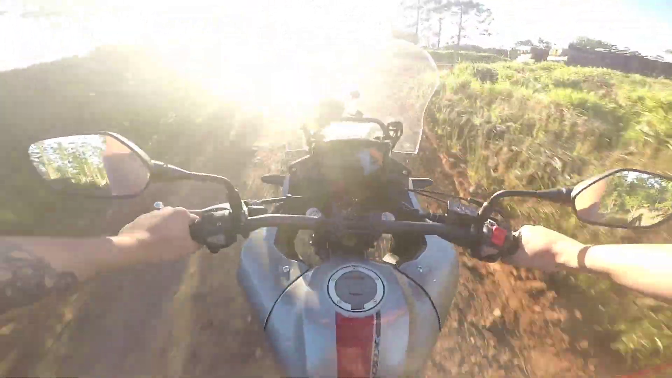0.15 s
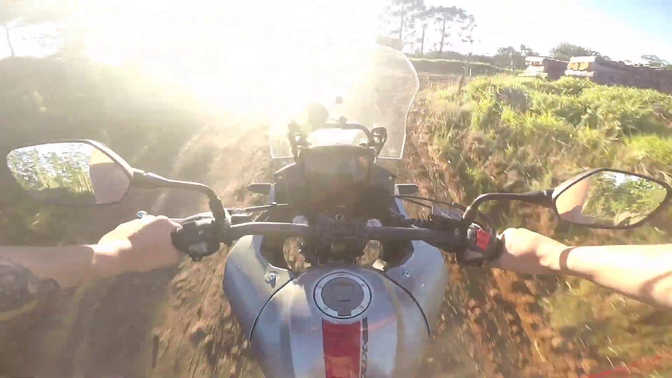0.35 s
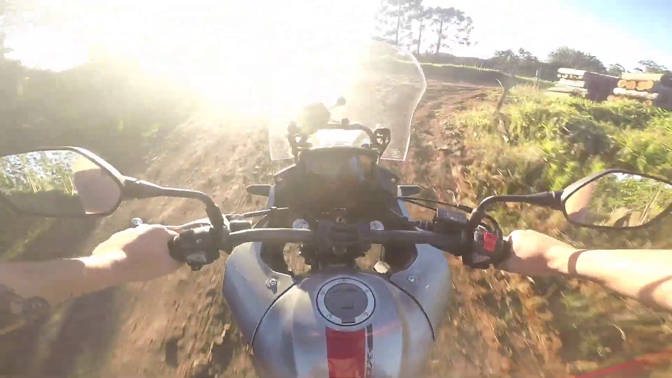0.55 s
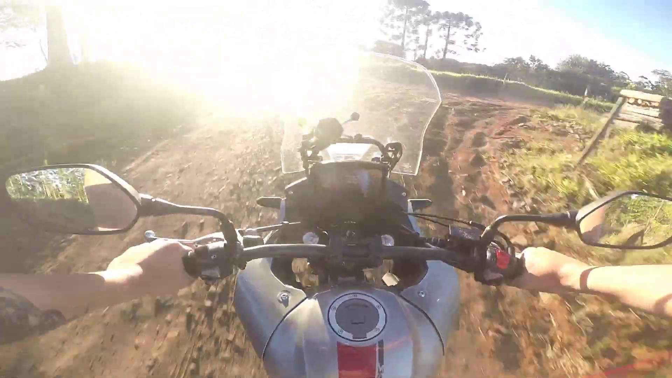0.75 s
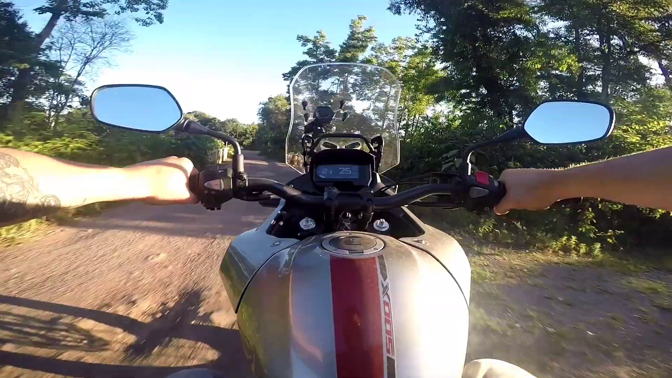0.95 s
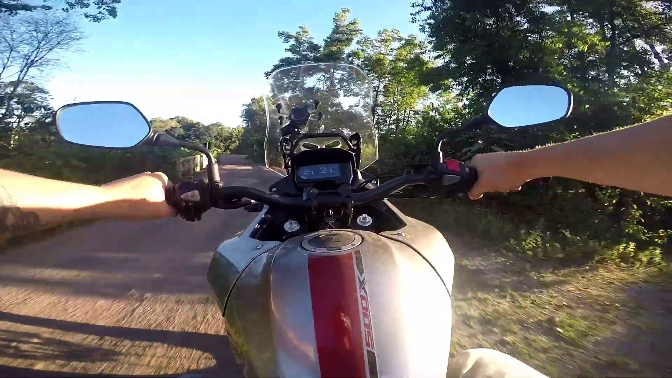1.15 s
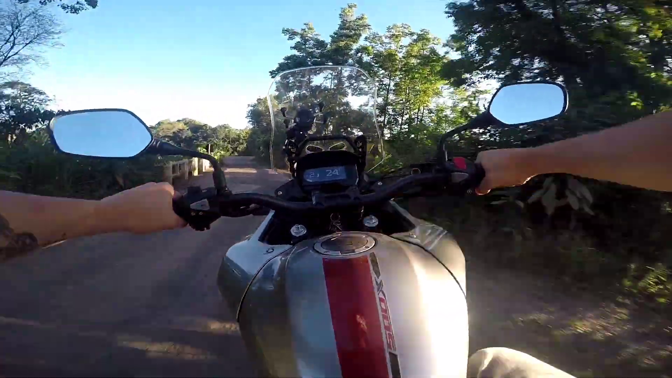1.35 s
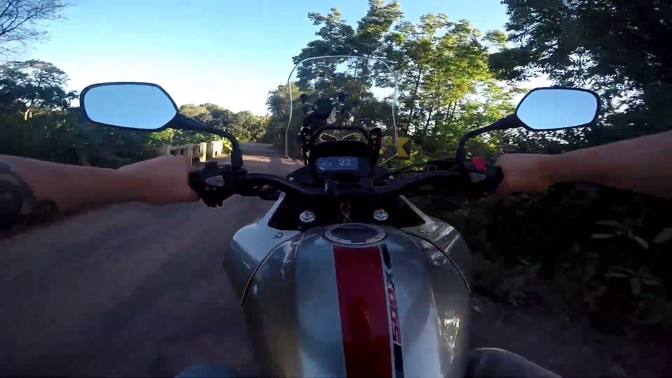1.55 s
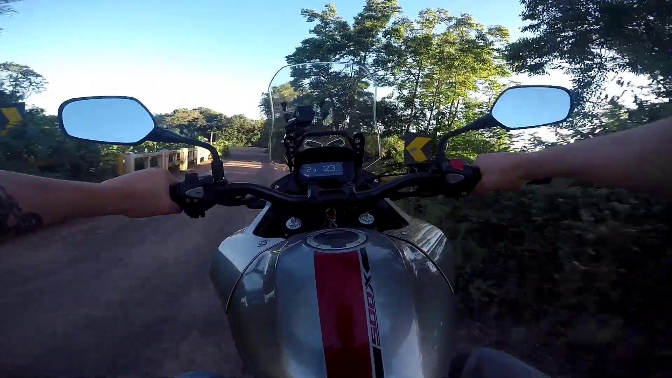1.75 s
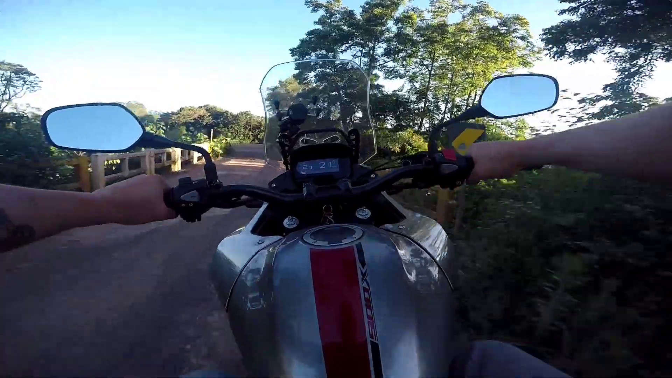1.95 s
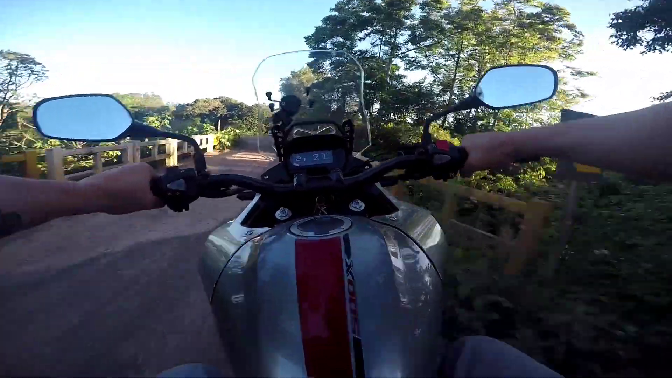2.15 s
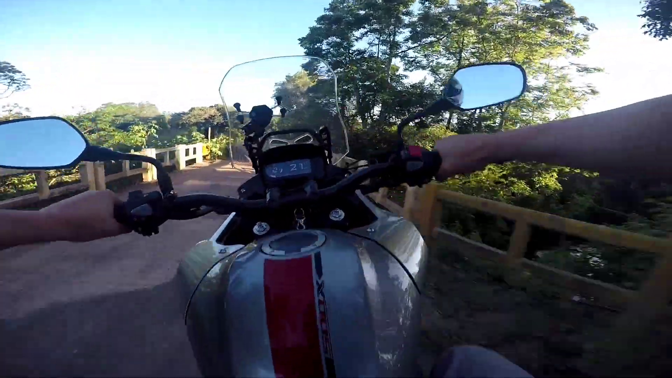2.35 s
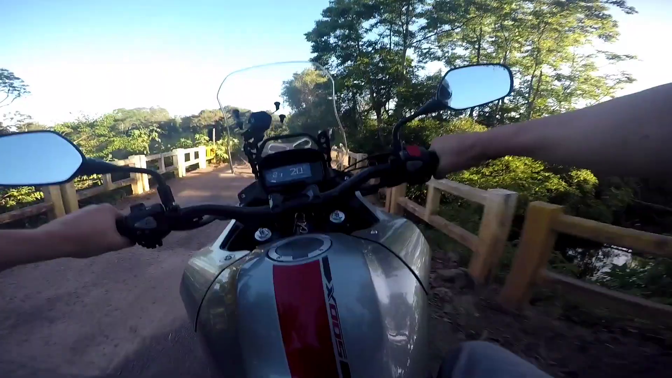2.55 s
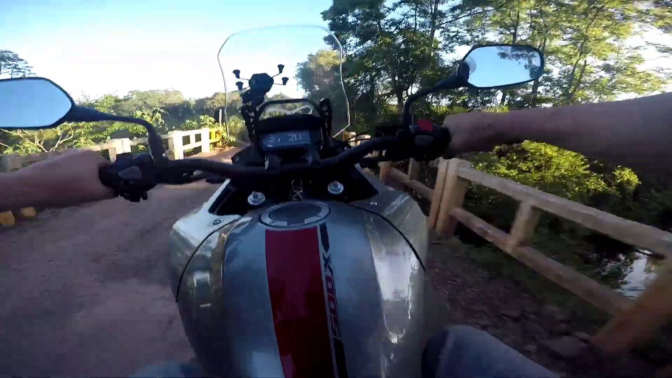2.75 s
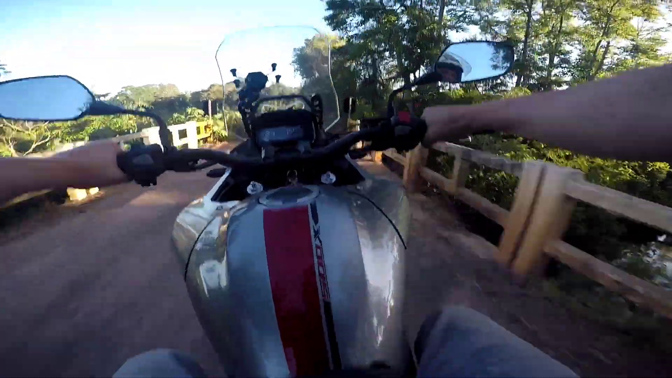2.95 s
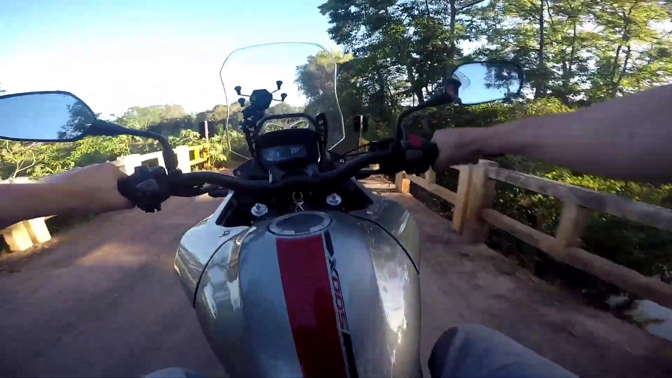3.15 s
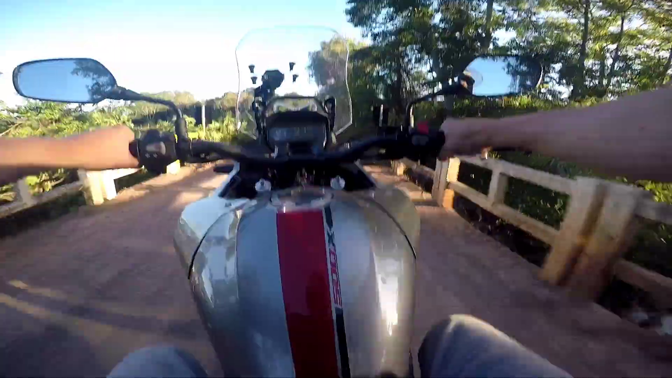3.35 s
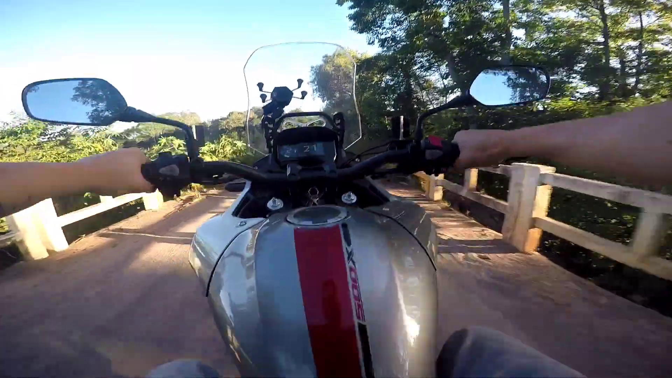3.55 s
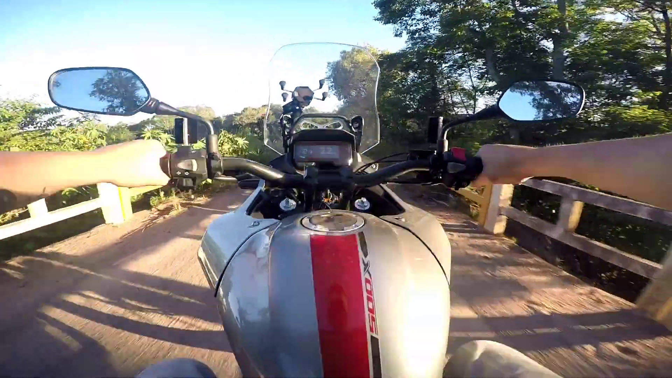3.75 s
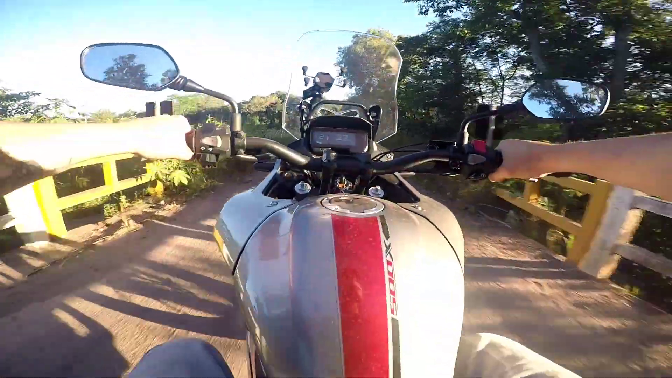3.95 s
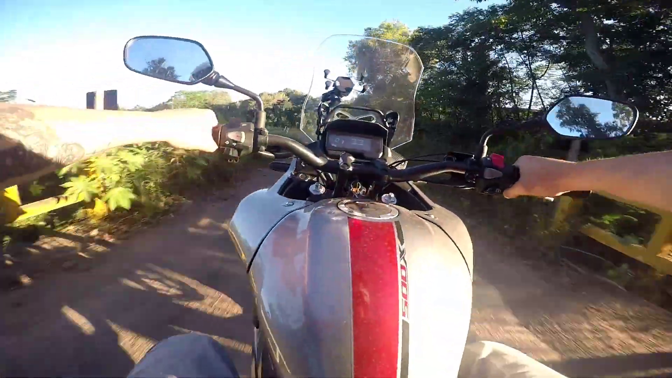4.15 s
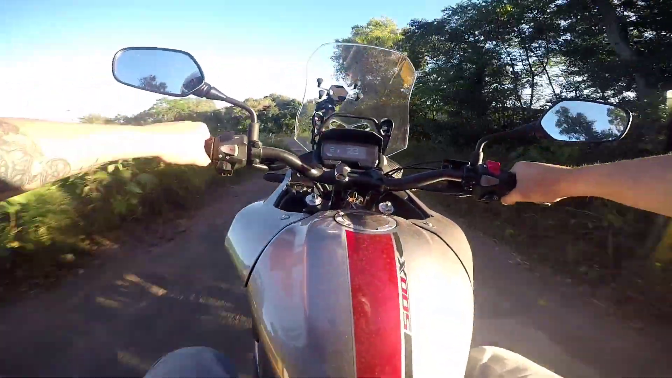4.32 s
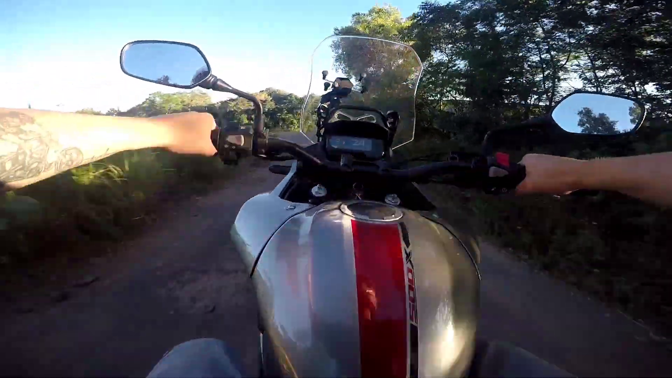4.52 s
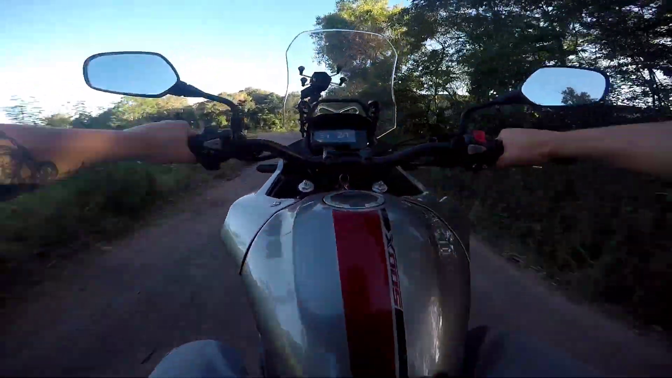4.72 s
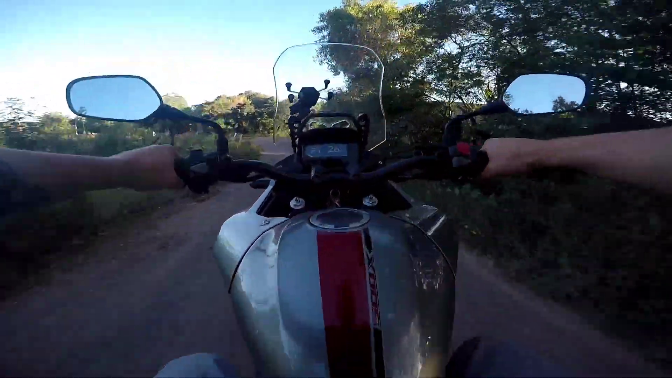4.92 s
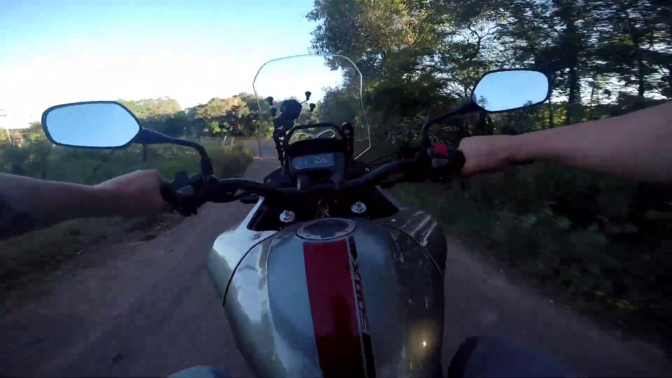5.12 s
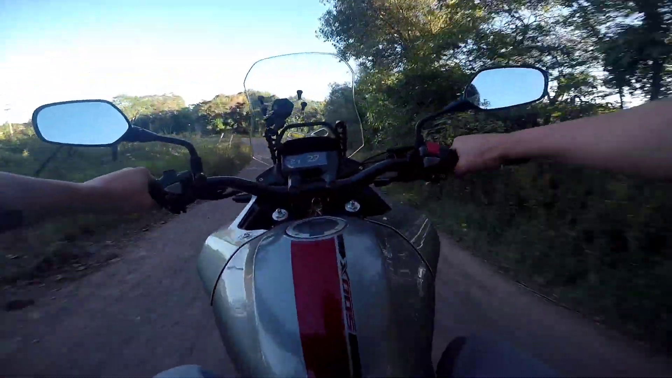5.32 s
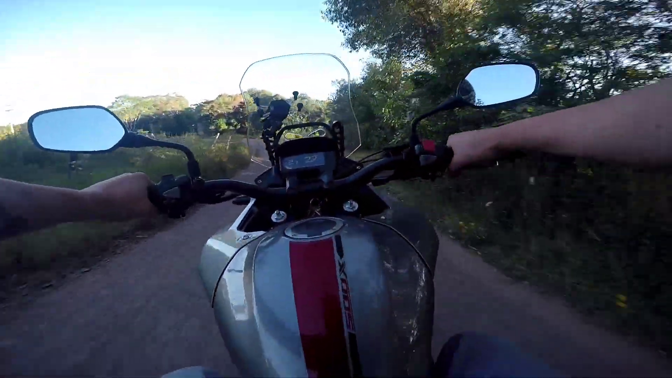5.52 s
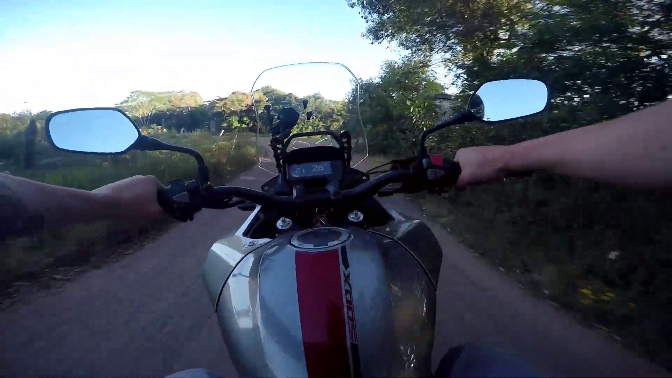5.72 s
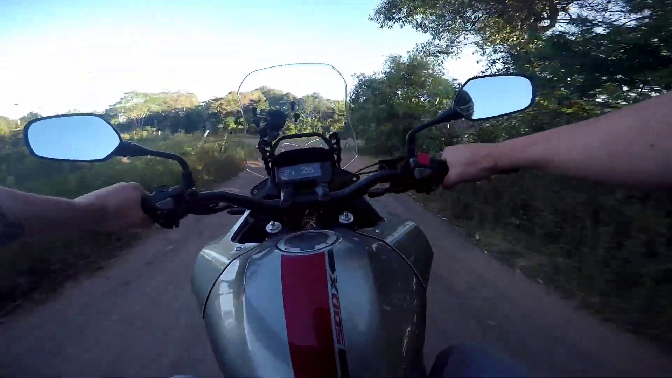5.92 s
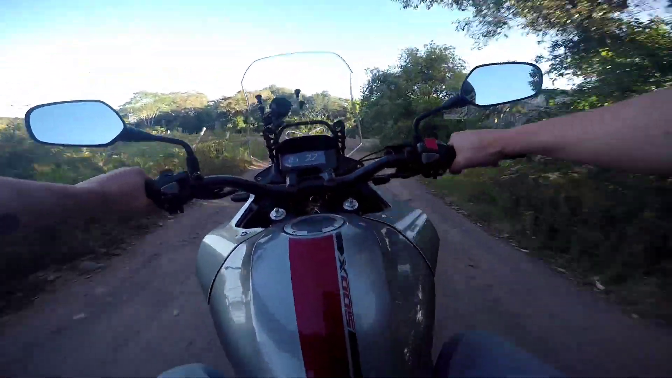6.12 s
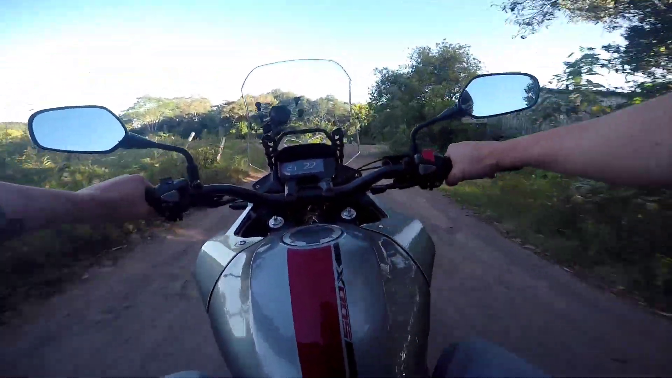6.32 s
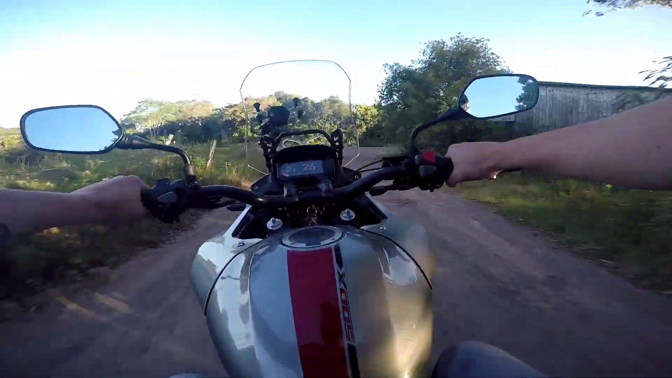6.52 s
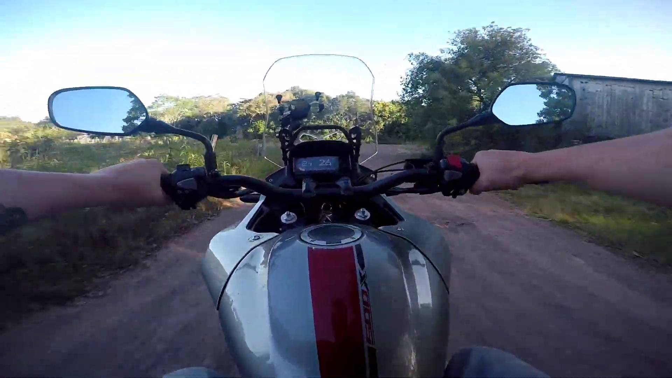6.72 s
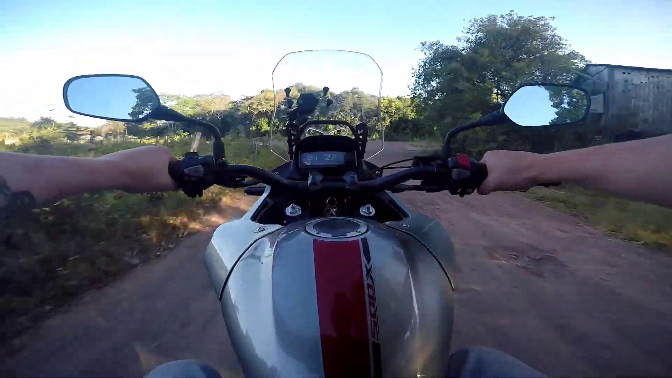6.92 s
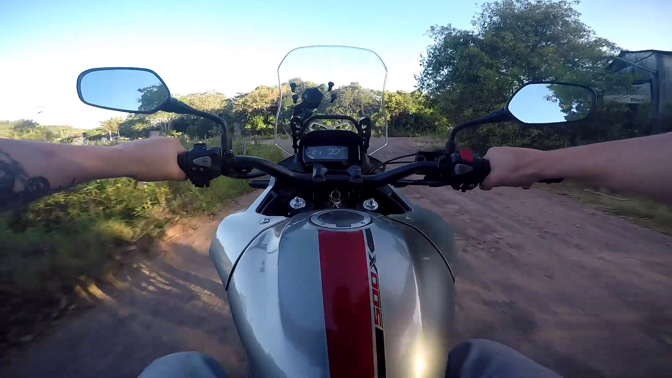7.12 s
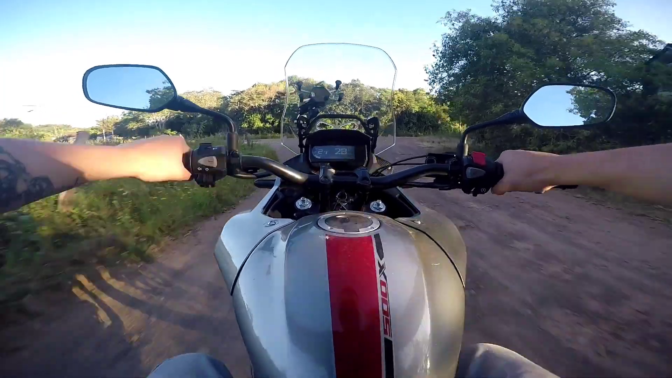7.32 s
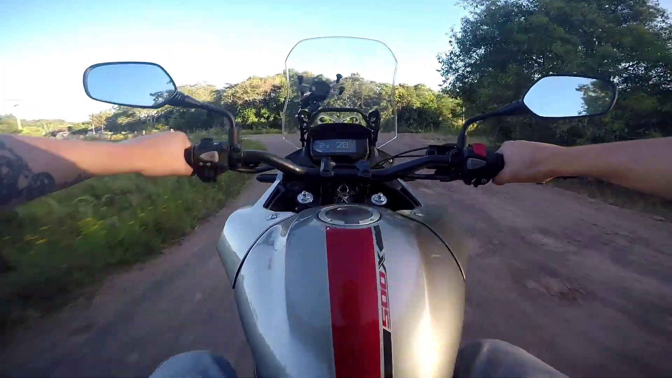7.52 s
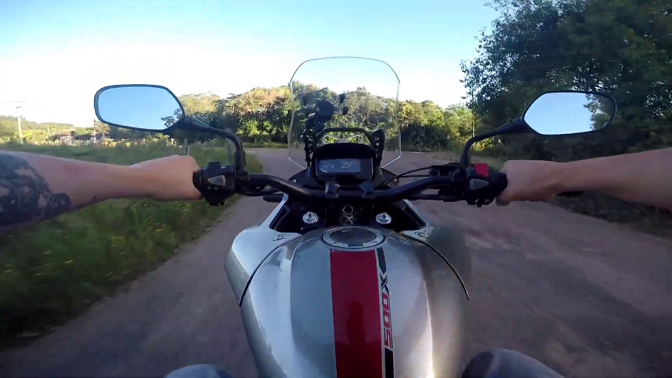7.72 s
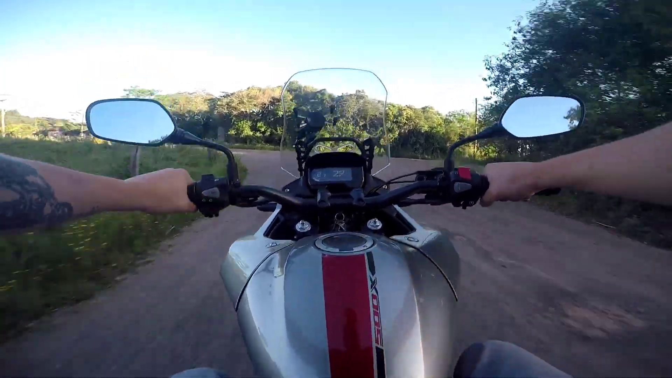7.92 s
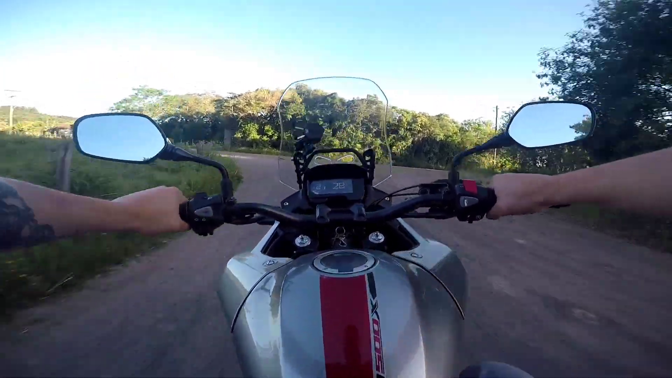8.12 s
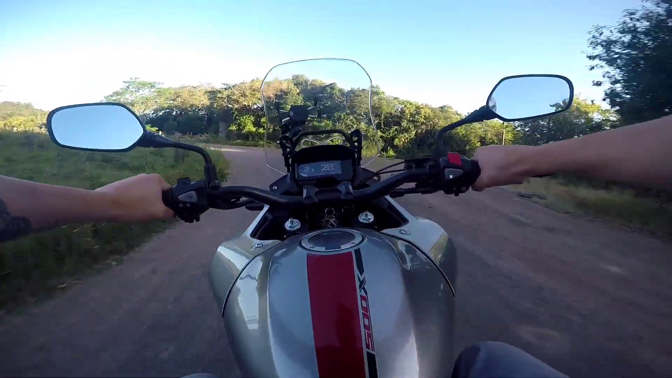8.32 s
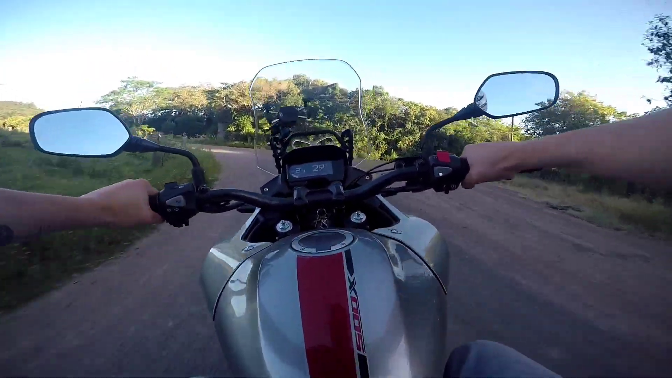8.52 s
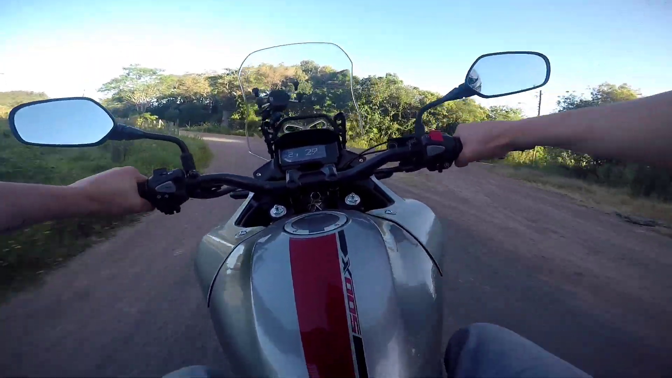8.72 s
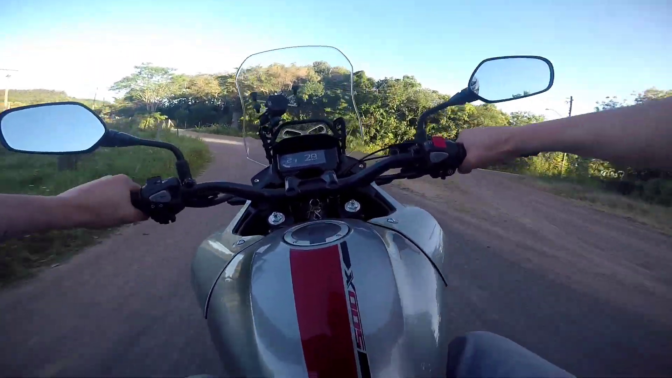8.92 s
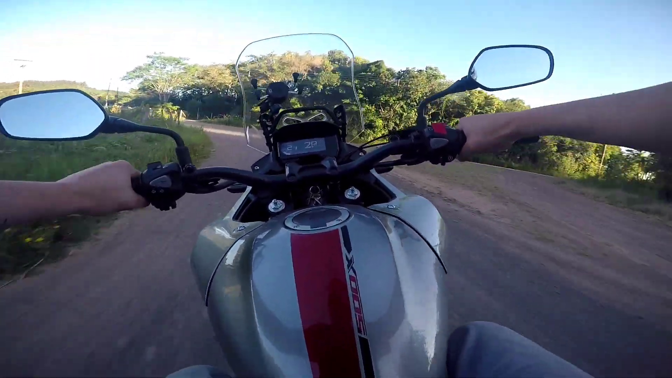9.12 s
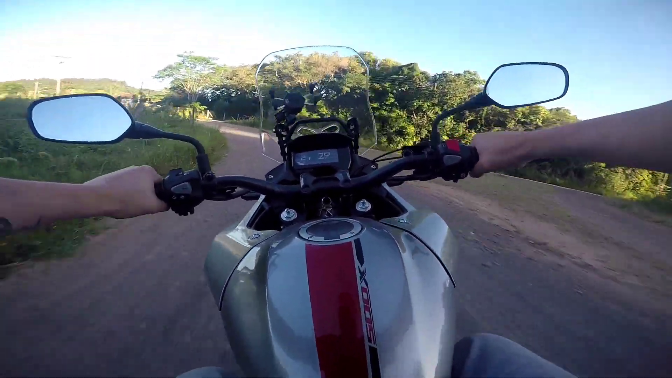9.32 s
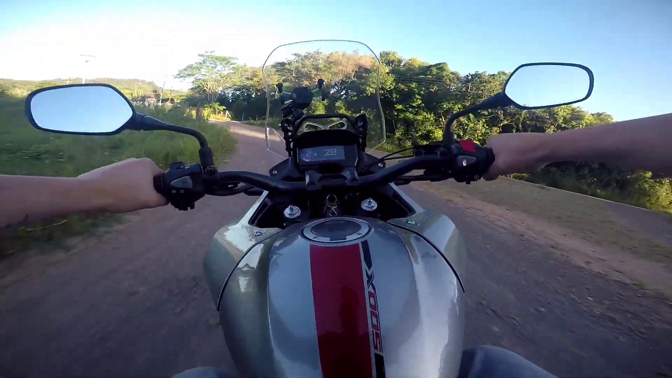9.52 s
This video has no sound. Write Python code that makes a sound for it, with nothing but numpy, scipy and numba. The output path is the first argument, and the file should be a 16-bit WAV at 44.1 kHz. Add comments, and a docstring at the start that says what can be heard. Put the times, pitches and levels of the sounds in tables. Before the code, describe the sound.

From a chest-worn camera, a twin-cylinder motorcycle throbs over loose stones with rattling fittings and gritty tyre noise. After a second the stones end and revs drop abruptly. Hard, boxy knocks and low heaves mark the bridge between two and three and a half seconds; then the exhaust barks as the bike pulls away on dirt. Wind buffets throughout.

```python
"""A motorcycle throbs and clatters over loose stones, sinks back, bumps over a small bridge and pulls away on dirt.
The parallel twin's exhaust is made of shaped firing pulses; clatter, tyres and grit are noise that rings the
case of a camera on the rider's chest. Random pressure makes the wind, and body panels drone.
Engine speed, a shared level and the ground set clatter, tyres, grit and bark; throb and wind follow timed levels.
Bumps knock the camera mount so hard that a limiter briefly ducks everything."""
import sys
import numpy as np
from scipy import signal
from scipy.fft import rfft, irfft, next_fast_len
from scipy.io import wavfile
from scipy.ndimage import uniform_filter1d, minimum_filter1d
from numba import njit

SR = 44100
rng = np.random.default_rng(int(sys.argv[2]) if len(sys.argv) > 2 else 0)


def generate_wav(sig):
    """Save sig (samples, or channels by samples) to the path in sys.argv[1] as 16-bit PCM at SR."""
    pcm = np.round(np.clip(np.atleast_2d(sig).T, -1, 1) * 32767).astype(np.int16)
    wavfile.write(sys.argv[1], SR, pcm)


N = 421596
TIME = np.arange(N) / SR  # seconds
# frequencies in Hz, with room after the sound so that echoes do not wrap round to the start
FREQ = np.maximum(np.fft.rfftfreq(2 * next_fast_len(N // 2 + 4096), 1 / SR), 1)

# engine speed in four-stroke cycles per second: (t/s, speed/Hz)
SPEED = [(0.0, 22.84), (0.92, 23.14), (0.925, 18.9), (1.44, 18.43), (2.04, 17.34), (2.4, 17.97),
         (3.36, 17.19), (4.56, 20.95), (5.04, 21.73), (5.4, 22.84), (5.52, 20.84), (5.64, 21.91),
         (6.36, 21.55), (6.6, 22.14), (6.72, 21.6), (7.2, 22.6), (7.8, 25.23), (7.92, 21.73), (8.04, 23.79),
         (8.4, 23.41), (8.64, 24.8), (8.76, 23.22), (9.12, 24.47), (9.24, 21.85), (9.56, 23.57)]


def undb(db):
    """Decibels to gain."""
    return 10 ** (np.asarray(db) / 20)


def unit(x):
    """Scale to rms 1."""
    return x / np.sqrt(np.mean(x ** 2))


def curves(table):
    """Each column of a timed table, joined by straight lines, sample by sample."""
    t, *columns = np.transpose(table)
    return [np.interp(TIME, t, column) for column in columns]


def across(hz, values):
    """Join points by straight lines on a log-frequency axis."""
    return np.interp(np.log(FREQ), np.log(hz), values)


def spectrum(x):
    """Sound to frequencies."""
    return rfft(x, 2 * len(FREQ) - 2)


def sound(z):
    """Frequencies to sound."""
    return irfft(z)[..., :N]


def causal(gain):
    """The minimum-phase response with this gain: it rings after a blow, never before."""
    cepstrum = irfft(np.log(gain + 1e-7))
    half = len(cepstrum) // 2
    folded = np.r_[cepstrum[0], 2 * cepstrum[1:half]]
    return np.exp(rfft(folded, 2 * half))


def band(low_hz, high_hz, order=3):
    """Gain of a smooth band-pass."""
    low_edge = 1 + (low_hz / FREQ) ** (2 * order)
    high_edge = 1 + (FREQ / high_hz) ** (2 * order)
    return (low_edge * high_edge) ** -.5


def resonance(hz, width_hz):
    """Response of one resonance, gain 1 at its centre."""
    return 1 / (1 + 1j * (FREQ ** 2 - hz ** 2) / (FREQ * width_hz))


def walk(rate):
    """A smoothly wandering random level of rms 1, with a new target every 1 / rate seconds."""
    hold = int(SR / rate)
    steps = np.repeat(rng.standard_normal(N // hold + 1), hold)
    return unit(uniform_filter1d(uniform_filter1d(steps, hold), hold)[:N])


def hump(s, half_s):
    """A smooth rise and fall around one moment; half_s away it is down to 37 %."""
    return np.exp(-((TIME - s) / half_s) ** 2)


def boost(table):
    """Extra dB over a few stretches of the ride."""
    return sum(db * hump(s, half_s) for s, db, half_s in table)


def swells(table, half_s):
    """Gain made of smooth rises and falls."""
    return sum(undb(db) * hump(s, half_s) for s, db in table)


def loudness(law, cruise_hz=22, stones_end_s=0.9):
    """Gain of a source as it follows engine speed, a shared level and the ground."""
    # shared level: clatter, road, grit and bark sink together twice, then return: (t/s, level/dB)
    shared_level = [(1.9, -4), (2.4, -7), (2.72, -9), (3.0, -9), (3.25, -4), (3.52, -10), (4.45, -0.5),
                    (7.6, -1.5), (8.1, -2), (9.56, 0)]
    # stretches where tyres, grit and clatter grow louder: (t/s, extra level/dB, half length/s)
    loud_stretches = [(1.1, 4.5, 0.45), (2.3, 10, 0.43), (3.26, 7.5, 0.34), (7.55, 5, 0.25)]
    cruise_db, doubling_db, stones_db, shared_part, stretch_part = law
    doublings = np.log2(curves(SPEED)[0] / cruise_hz)
    # the ride starts on loose stones, which end abruptly
    stones = np.interp(TIME, [stones_end_s - .01, stones_end_s + .01], [1, 0])
    ground_db = stones_db * stones + stretch_part * boost(loud_stretches)
    return undb(cruise_db + doubling_db * doublings + shared_part * curves(shared_level)[0] + ground_db)


def strokes(cycle, places, scatter_db):
    """A pulse whenever the engine cycle passes one of these places, each of its own strength."""
    at = (np.arange(int(cycle[-1]) + 1)[:, None] + places).ravel()
    index = np.searchsorted(cycle, at)
    size = undb(scatter_db * rng.standard_normal(4096))[:len(at)]
    return np.bincount(index, size, N + 1)[:N]


def case_response():
    """Direct and diffuse paths through the case; in the mid range it rocks, so the sides move in opposition."""
    # resonances of the camera case: (f/Hz, width/Hz, relative level/dB)
    case_modes = [(250, 470, -6.5), (601, 118, -4.5), (823, 214, 1), (1053, 100, 0.5), (1195, 153, -1.5),
                  (1520, 910, -10.5), (1778, 453, -2.5), (2390, 610, -19.5), (2990, 620, -23.5),
                  (3640, 710, -28), (4310, 420, -26.5), (4950, 1400, -31), (5860, 2550, -30.5),
                  (7505, 970, -27), (9000, 2830, -37)]
    # share of the sound power that reaches each microphone on its own: (f/Hz, share 0-1)
    separate_share = [(170, 0.49), (320, 0.26), (600, 0.04), (1100, 0.06), (1850, 0.01), (2300, 0.76),
                      (5000, 0.35), (6500, 0.78), (12000, 1)]
    # how the two microphones differ: (f/Hz, left minus right/dB, phase by which left leads/rad)
    ports = [(270, -1.5, -2.9), (570, -5, -3.4), (830, -3.2, -3.65), (1070, .8, -3.5), (1600, 3.5, -3.9),
             (1800, 1.5, -4.9), (2000, -1, -5.2), (2400, -7, -6.5), (2940, -1.6, -5.8), (3600, -3.7, -5.4),
             (4500, -6, -2.5), (5200, -.8, -2.9), (7400, 2.7, -4.7), (12000, 0, 0)]
    hz, balance_db, lead = np.transpose(ports)
    power = sum(undb(db) ** 2 * np.abs(resonance(f, width)) ** 4 for f, width, db in case_modes)
    # each side takes half of the difference
    sides = np.array([[1], [-1]]) / 2
    balance = undb(sides * across(hz, balance_db)) * np.exp(1j * sides * across(hz, lead))
    ring = causal(np.sqrt(power)) * balance
    share = np.clip(across(*np.transpose(separate_share)), 0, 1)
    return ring * np.sqrt(1 - share), ring * np.sqrt(share)


def shake(case, force, colour):
    """Noise that follows a force envelope rings the case."""
    direct, diffuse = case
    # one noise is common to both microphones, two are separate
    noise = spectrum(force * rng.standard_normal((3, N)))
    return sound(colour * (direct * noise[0] + diffuse * noise[1:]))


def firings(cycle, scatter_db, first=0.898, second_db=-5):
    """The twin fires twice, a quarter cycle apart and the second time weaker, then rests."""
    first_pulses = strokes(cycle, [first], scatter_db)
    second_pulses = strokes(cycle, [first + 1 / 4], scatter_db)
    return spectrum(first_pulses + undb(second_db) * second_pulses)


def exhaust(cycle, firm_scatter_db=0.0, shut_scatter_db=1.3):
    """Firing pulses shaped by the silencer: even under throttle, uneven when shut; the pipe adds a bark."""
    # the throttle and the throb it draws from the exhaust: (t/s, opening 0-1, throb level/dB)
    throttle = [(0, 0.9, -22), (.91, 0.66, -27.5), (.93, 0.45, -24.5), (1.6, 0.6, -30), (2.1, 1, -27.5),
                (2.75, 0.6, -40), (3.2, 1, -31), (3.6, 0.97, -34.5), (4.0, 0.82, -28), (4.55, 0.86, -24.5),
                (5.45, 0.43, -22), (5.55, 0.3, -27), (5.65, 0, -22), (6.3, 0.1, -24.5), (6.75, 0, -23.5),
                (7.0, 0.9, -22), (7.75, 0.8, -21.5), (7.9, 0, -23), (8.6, 0, -24), (9.56, 0, -22)]
    # tone of one firing behind the silencer at the mean engine speed, as relative levels:
    # (f/Hz, pulling freely/dB, lugging at low speed/dB, throttle shut/dB)
    silencer = [(25, -26, -34, -44), (43, -14, -19, -18), (64, -20, -13.5, -12.5), (85.8, -4, -3.5, -4),
                (110, -1.5, -0.5, -7), (125.6, -12.5, -3, -14), (149.4, -16.5, -7.5, -26.5),
                (171, -24.5, -11, -33.5), (189, -30, -16, -27), (215, -28, -28, -26.5),
                (263, -31.5, -47, -31.5), (324, -38.5, -37, -39.5), (600, -37.5, -50, -41),
                (1500, -105, -105, -105)]
    # the bark: (level at cruise/dB, per doubling of speed/dB, extra on stones/dB,
    # share of the shared level, share of the loud stretches: negative, so it sinks there)
    bark_law = (-48, -14, -20, 0.5, -1)
    # the pipe barks as the bike pulls away from the bridge: (t/s, extra level/dB, half length/s)
    pull = [(4.4, 6, 1.4)]
    opening, throb_db = curves(throttle)
    opening = np.clip(opening, 0, 1)
    even = np.linspace(0, cycle[-1], N)
    firm = firings(even, firm_scatter_db)
    uneven = firings(even, shut_scatter_db)
    running = firings(cycle, firm_scatter_db)

    # valve timing shapes the throb, so it is made at constant speed, then stretched with engine speed
    hz, free_db, lugging_db, shut_db = np.transpose(silencer)

    def throb(pulses, tone_db):
        steady = sound(pulses * causal(undb(across(hz, tone_db))))
        return unit(np.interp(cycle, even, steady))

    free, lugging, shut = throb(firm, free_db), throb(firm, lugging_db), throb(uneven, shut_db)
    # it lugs below the first speed and pulls freely above the second (cycles per second)
    strain = np.interp(curves(SPEED)[0], [19.6, 21.66], [1, 0])
    pulling = strain * lugging + (1 - strain) * free
    # the pipe's resonance stays put when engine speed changes
    pipe = unit(sound(running * resonance(hz=253.6, width_hz=34) ** 2))
    bark = loudness(bark_law) * undb(boost(pull)) * pipe
    return undb(throb_db) * (opening * pulling + (1 - opening) * shut) + opening * bark


def clatter(case, cycle, tap_s=0.0043, wash=0.75, steady_db=-5, throb=0.016):
    """Valves and chain tap at the same places in every cycle, as a rough rasp and a steadier ring of the block."""
    # (level at cruise/dB, per doubling of speed/dB, extra on stones/dB,
    # share of the shared level, share of the loud stretches)
    clatter_law = (-26, 2.5, -3.5, 0.94, 0.2)
    # the clatter flares and eases: (t/s, extra level/dB, half length/s)
    flares = [(1.35, 2, 0.21), (3.25, 0, 0.13), (4.3, -1, 0.18), (4.51, 2.5, 0.031), (4.98, 2, 0.05),
              (7.5, 1, .2)]
    places = (np.arange(8) + rng.uniform(-.3, .3, 8)) / 8
    taps = strokes(cycle, places, scatter_db=3.0)
    # the power of each tap dies away over tap_s, above a constant wash
    tap_power = unit(signal.lfilter([1], [1, -np.exp(-1 / (tap_s * SR))], taps ** 2))
    force = np.sqrt(tap_power + wash)
    colour = band(565, 4700)
    pulse = 1 + throb * np.cos(2 * np.pi * (cycle - .2))
    rasp = unit(shake(case, force * pulse, colour))
    # each tap spreads through the engine block before it reaches the case
    block = rng.standard_normal(N) * np.exp(-TIME / 0.011)
    spread = np.exp(1j * np.angle(spectrum(block)))
    steady = unit(sound(spectrum(taps) * spread * colour * case[0]))
    return loudness(clatter_law) * undb(boost(flares)) * unit(rasp + undb(steady_db) * steady)


def road(case, patchy_db=2.0):
    """Tyres drum over uneven dirt: low noise of wandering strength shakes the case."""
    # (level at cruise/dB, per doubling of speed/dB, extra on stones/dB,
    # share of the shared level, share of the loud stretches)
    road_law = (-27, 14.5, 5.5, 0.79, 0.97)
    force = undb(patchy_db * walk(45))
    return loudness(road_law) * unit(shake(case, force, band(140, 680)))


def grit(case, cycle, grain_db=1.0, patchy_db=1.17, throb=0.02):
    """Grit crunches as flickering treble noise, which pulses slightly four times per engine cycle."""
    # (level at cruise/dB, per doubling of speed/dB, extra on stones/dB,
    # share of the shared level, share of the loud stretches)
    grit_law = (-37.5, 5, 4, 0.81, 0.38)
    pulse = 1 + throb * np.cos(8 * np.pi * cycle)
    force = undb(grain_db * walk(700) + patchy_db * walk(25)) * pulse
    crunch = unit(shake(case, force, band(2738, 10840, order=4)))
    return (loudness(grit_law) + spray()) * crunch


def wind(gust_db=1.85):
    """Gusty buffeting: random pressure squeezes the case and also rocks it."""
    # wind pressure on the case, as relative levels:
    # (f/Hz, squeezing both microphones alike/dB, rocking them in opposition/dB)
    buffet = [(5, -8.5, -20), (11.6, 3.5, -4), (22, -7.5, -17), (35, -10, -16), (55, -14.5, -12.5),
              (114, -11, -11.5), (174, -24.5, -28), (267, -30.5, -50), (600, -76, -80)]
    # the buffeting swells and sinks along the ride: (t/s, level before gusts/dB)
    wind_strength = [(0, -23.5), (.5, -22.5), (.91, -24.5), (.93, -25), (1.4, -26.5), (1.9, -29),
                     (2.15, -23.5), (2.55, -19), (2.75, -33.5), (3.05, -26.5), (3.45, -26.5), (3.7, -38.5),
                     (4.05, -30), (4.45, -27), (4.8, -24), (5.05, -26), (5.7, -25.5), (6.5, -27.5),
                     (7.2, -26.5), (7.55, -20.5), (8.3, -27), (9.1, -23.5), (9.56, -23.5)]
    hz, alike_db, opposed_db = np.transpose(buffet)
    colours = undb([across(hz, alike_db), across(hz, opposed_db)])
    mid, side = sound(spectrum(rng.standard_normal((2, N))) * colours)
    gusts = undb(curves(wind_strength)[0] + gust_db * walk(9))
    return unit(np.array([mid + side, mid - side])) * gusts


def panel(case, cycle, width_hz=50, scatter_db=3.5, half_s=0.16):
    """Narrow resonances of the bodywork panels, kicked once a cycle, swell and fade."""
    # when each panel drones: (t/s, level at the height of the swell/dB, f/Hz)
    drones = [(.1, -29, 828), (1.15, -28, 844), (1.85, -31.5, 1168), (2.68, -36, 1206), (3.2, -30.5, 823),
              (4.08, -39, 743), (4.55, -50, 750), (5.72, -23.5, 854), (6.07, -28.5, 822), (6.95, -26, 812),
              (7.55, -24.5, 851), (8.15, -30, 866), (8.35, -38, 1214), (8.95, -35, 1207),
              (9.42, -26.5, 822)]
    kicks = spectrum(strokes(cycle, [0], scatter_db)) * case[0]
    out = 0
    for s, db, hz in drones:
        drone = unit(sound(kicks * resonance(hz, width_hz) ** 2))
        out = out + undb(db) * hump(s, half_s) * drone
    return out


def rattles(case, trim_db=-9):
    """Fittings rattle on rough ground: short bursts of noise ring the case and also pass through the air."""
    # (t/s, burst level before the overall trim/dB, decay time/s, share heard through the air)
    rattle_bursts = [(.031, -5, 0.0073, .3), (.095, -5, .008, 0.31), (.105, -11, 0.0074, 0.65),
                     (.44, -1, 0.0058, 0.19), (1.088, -11, 0.01, .1), (1.407, -9, 0.0064, 0.092),
                     (2.447, -7.5, 0.025, .08), (2.882, -19, .005, .1), (2.914, -13.5, 0.039, 0.082),
                     (3.342, -9, 0.011, .1), (3.406, -8, .008, .1), (3.445, -18, 0.024, .05),
                     (4.524, -10, .0068, .1), (4.982, 4.5, 0.0025, 0.18), (7.399, -9, .0039, .1),
                     (8.634, -8.5, .0041, 0.26)]
    force, airborne = np.zeros(N), np.zeros(N)
    for s, db, decay, share in rattle_bursts:
        burst = undb(db) * (TIME >= s) * np.exp(-np.abs(TIME - s) / decay)
        force += burst
        airborne += burst * share
    colour = band(540, 1200, order=6)
    through_air = airborne * unit(sound(spectrum(rng.standard_normal(N)) * colour))
    through_case = unit(shake(case, force, colour)) * np.sqrt(np.mean(force ** 2))
    return (through_case + through_air) * undb(trim_db)


def knocks(lag_s=0.00009, rise_s=0.0032, stiffen=0.47, stiffen_s=0.0018,
           drive=1.2, crack_db=-14, crack_s=0.0025):
    """Bumps crack the mount's joint and swing it: stiff at first, sinking in pitch, flattened by end stops."""
    # bumps: (t/s, peak level on the right/dB, contact time/ms, left side's share of the swing)
    mount_bumps = [(2.181, 20, 0.8, -0.54), (2.386, 23, 0.54, -0.53), (2.458, -2, 4.5, -.4),
                   (2.477, -1, 1.5, -0.66), (2.522, -7, 1.4, -0.93), (2.524, -1, 8, -0.45),
                   (2.603, 10.5, 0.89, -0.57), (2.8803, -10, 1.4, -0.43), (2.8842, -1.5, 4.1, -0.54),
                   (2.89, -10.5, 2.5, -0.54), (2.921, -15, 1.1, -0.7), (2.931, -11, 4.7, -.5),
                   (3.0581, 5.5, 1.4, -0.58), (3.295, 28.5, 0.49, -0.51), (3.352, -4, 2.7, -0.7),
                   (3.4075, -9, 0.56, -0.9), (3.413, -8, 8.5, -0.91), (3.423, -13, 1.3, -0.79),
                   (3.433, -15, 1.3, -0.8), (4.785, -9, 1.4, -0.76), (5.915, 0.5, 2.6, -0.63),
                   (7.803, 22, .85, -0.54), (8.118, -9.5, 1.6, -0.47)]
    # modes of the mount once the pitch has sunk: (f/Hz, time to fall by 60 dB/s, relative level/dB)
    mount_modes = [(121, 0.051, -8.5), (301.4, 0.02, 7.5), (399, 0.0092, 14.5), (505, 0.0088, 3.5),
                   (627, 0.009, 5), (816, 0.017, 0.5), (1900, .013, -20)]
    out, t = np.zeros((2, N)), TIME[:SR // 5]
    # time runs faster at first, which raises the pitch
    bent = t + stiffen * stiffen_s * (1 - np.exp(-t / stiffen_s))
    swing = sum(undb(db) * np.sin(2 * np.pi * hz * bent) * np.exp(-np.log(1000) * t / t60)
                for hz, t60, db in mount_modes)
    crack_noise = unit(sound(spectrum(rng.standard_normal(N)) * band(1100, 3500)))
    crack = crack_noise[:len(t)] * np.exp(-t / crack_s)
    ring = swing * (1 - np.exp(-t / rise_s)) + undb(crack_db) * crack
    for s, db, contact_ms, left in mount_bumps:
        push = t * np.exp(-t * 4000 / contact_ms)
        blow = signal.fftconvolve(ring, push)[:len(t)]
        flattened = np.tanh(drive * blow / np.abs(blow).max()) / np.tanh(drive)
        start = int(s * SR)
        # the case rocks: the left share is negative, so the sides move against each other
        out[:, start:start + len(t)] += np.outer([left, 1], undb(db) * flattened)
    return np.array([np.interp(TIME - lag_s, TIME, out[0]), out[1]])


def spray():
    """Gain of the gravel thrown up by the tyres: sudden, then dying away."""
    # hard landings and skips of the rear wheel: (t/s, starting level/dB, decay time/s)
    gravel = [(2.445, -25, 0.0087), (2.9, -40.5, 0.024), (5.53, -43, 0.043), (8.6, -41, 0.03)]
    return sum(undb(db) * (TIME >= s) * np.exp(-np.abs(TIME - s) / decay) for s, db, decay in gravel)


def heaves(cycles=1.0, judder_db=-13, lag_s=0.00265):
    """Bottoming suspension heaves the camera: a slow swing with a judder inside, reaching the left first."""
    # (t/s, strength of the swing before it fades/dB, f/Hz)
    bottomings = [(2.448, -2, 25), (2.499, -15, 11.4), (2.91, -14.5, 19), (3.33, -3, 19.5),
                  (3.419, -15, 17)]
    out = np.zeros(N)
    judder = undb(judder_db) * unit(sound(spectrum(rng.standard_normal(N)) * band(80, 84, order=2)))
    for s, db, hz in bottomings:
        turns = np.maximum(TIME - s, 0) * hz
        swing = np.sin(2 * np.pi * turns) + judder * np.tanh(2 * np.pi * turns)
        out += undb(db) * swing * np.exp(-(turns / cycles) ** 2)
    return np.array([out, np.interp(TIME - lag_s, TIME, out)])


def whistle(case, hz=3280, width_hz=330, half_s=0.16):
    """A thin, airy tone: noise through a narrow resonance and the case swells and fades."""
    # (t/s, level at the height of the swell/dB)
    whistle_swells = [(8.15, -45), (9.0, -47)]
    return swells(whistle_swells, half_s) * unit(shake(case, 1, resonance(hz, width_hz) ** 2))


def scene():
    """Engine, ground and wind as the camera case hears them."""
    cycle = np.cumsum(curves(SPEED)[0]) / SR  # engine cycles completed so far
    case = case_response()
    engine = exhaust(cycle) + clatter(case, cycle)
    ground = road(case) + grit(case, cycle)
    air = wind() + whistle(case)
    bumps = rattles(case) + knocks() + heaves()
    return engine + panel(case, cycle) + ground + air + bumps


@njit
def recover(over, keep):
    """Follow a rise at once, then let go slowly."""
    out, held = np.empty(len(over)), 0.
    for i in range(len(over)):
        held = max(over[i], held * keep)
        out[i] = held
    return out


def record(dry, limit=0.91, release_s=0.059, lookahead_s=.0022, top_hz=14200):
    """A look-ahead limiter ducks both channels around each overload; the top is cut."""
    over_db = 20 * np.log10(np.maximum(np.abs(dry).max(axis=0) / limit, 1))
    ahead = int(lookahead_s * SR) + 1
    # the largest overload nearby sets the ducking
    worst_db = -minimum_filter1d(-over_db, ahead)
    held_db = recover(worst_db, np.exp(-1 / (release_s * SR)))
    limited = dry * undb(-uniform_filter1d(held_db, ahead))
    return signal.sosfilt(signal.ellip(8, .2, 70, top_hz, fs=SR, output="sos"), limited)


dry = scene()
out = record(dry)
generate_wav(out)
```